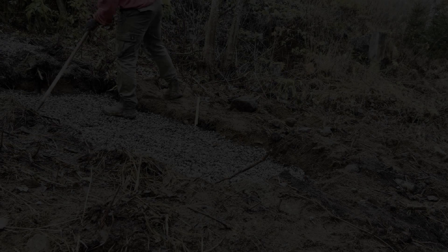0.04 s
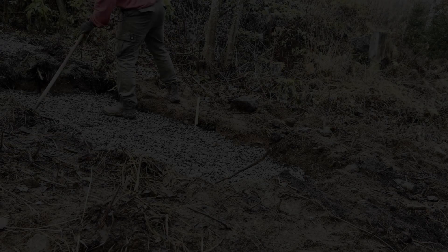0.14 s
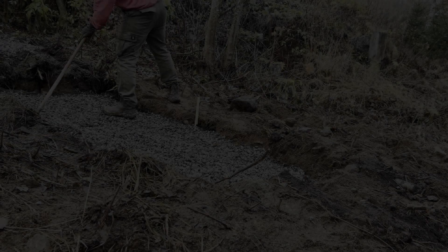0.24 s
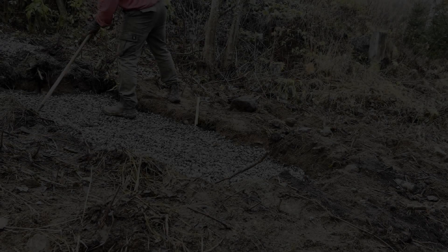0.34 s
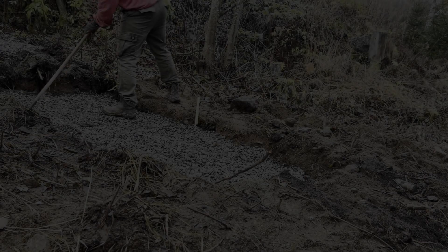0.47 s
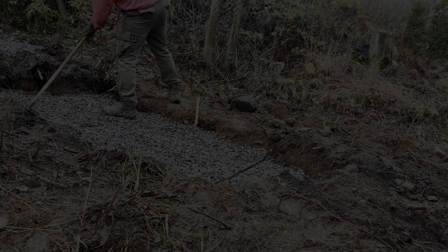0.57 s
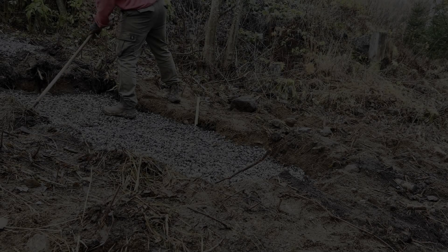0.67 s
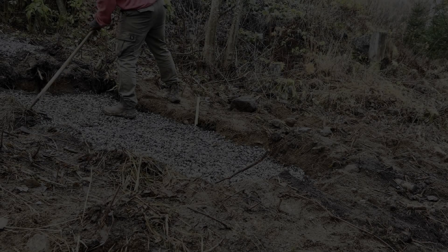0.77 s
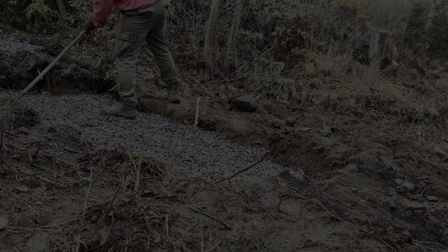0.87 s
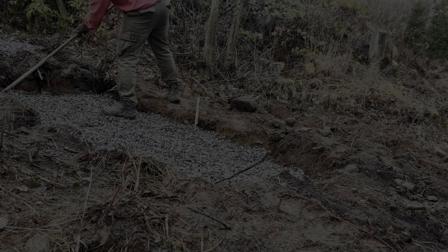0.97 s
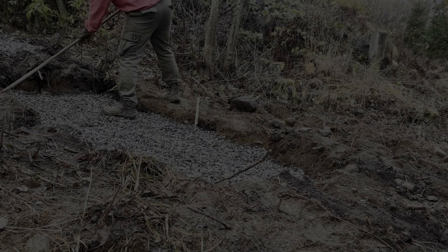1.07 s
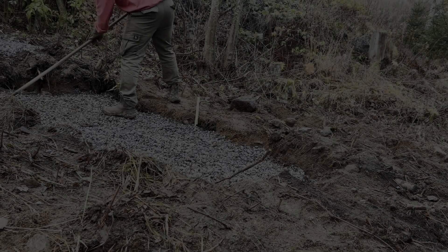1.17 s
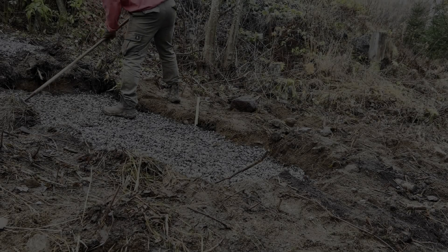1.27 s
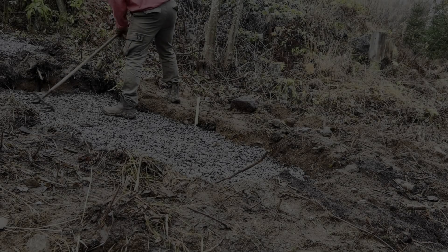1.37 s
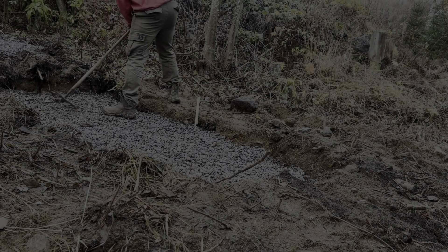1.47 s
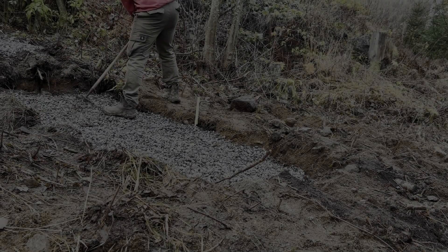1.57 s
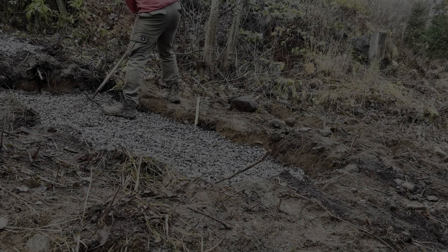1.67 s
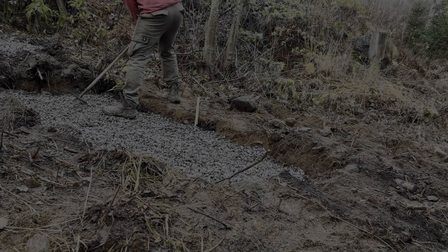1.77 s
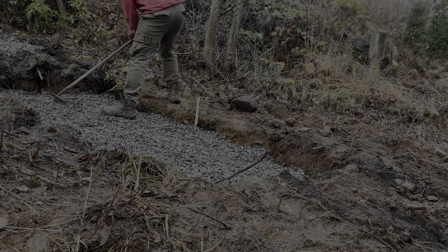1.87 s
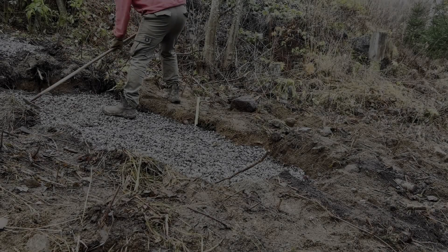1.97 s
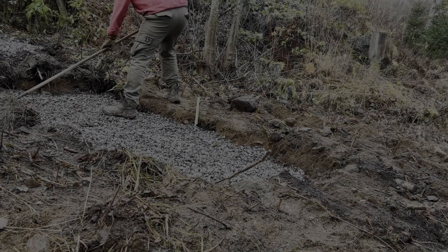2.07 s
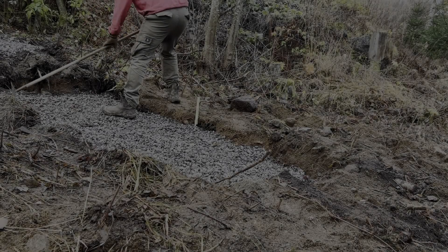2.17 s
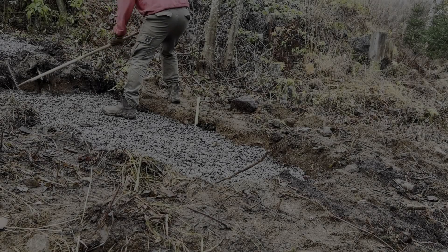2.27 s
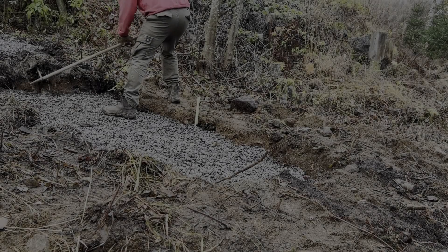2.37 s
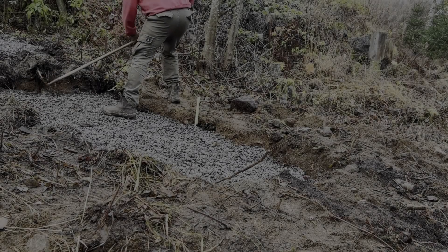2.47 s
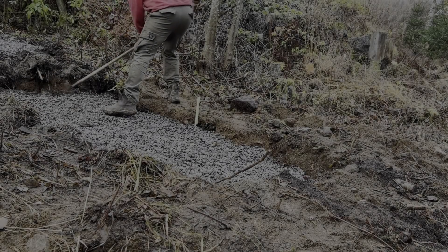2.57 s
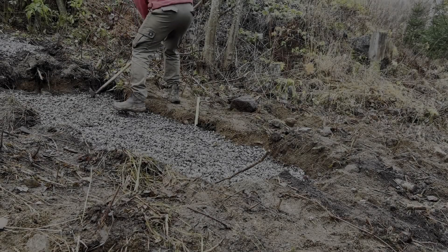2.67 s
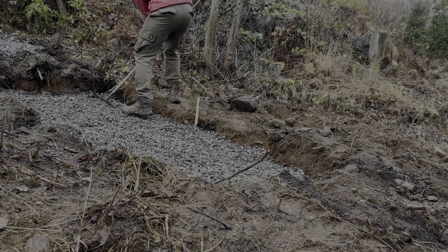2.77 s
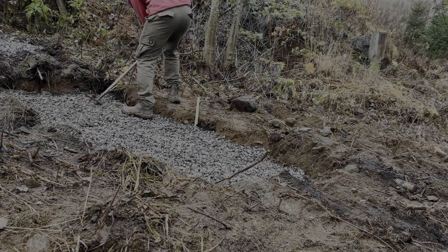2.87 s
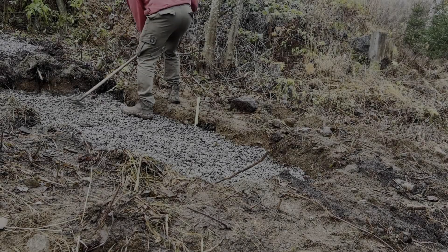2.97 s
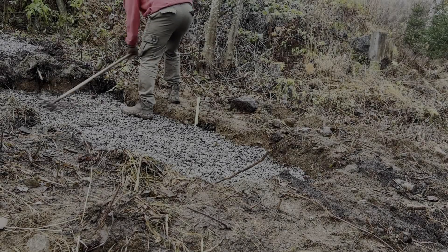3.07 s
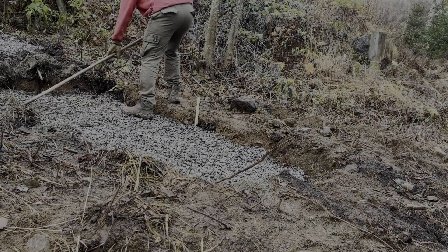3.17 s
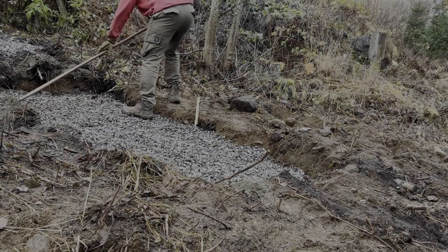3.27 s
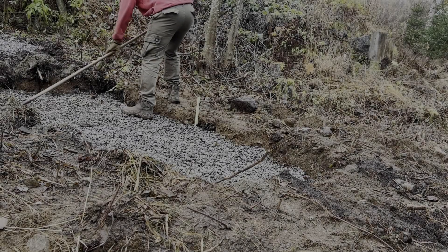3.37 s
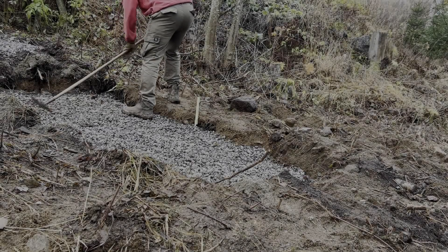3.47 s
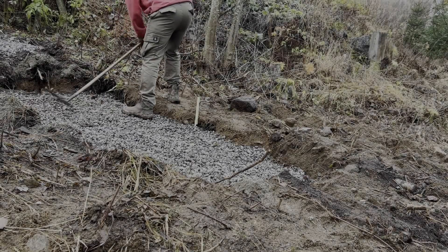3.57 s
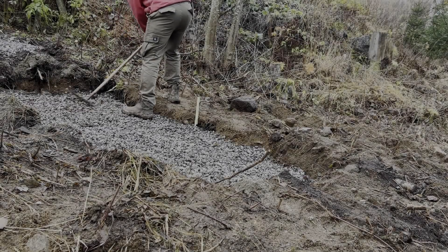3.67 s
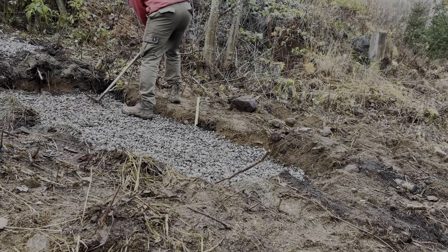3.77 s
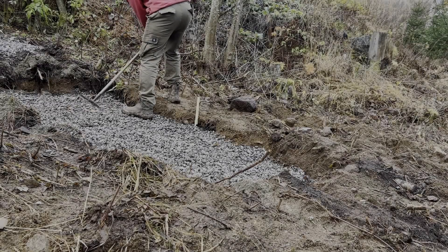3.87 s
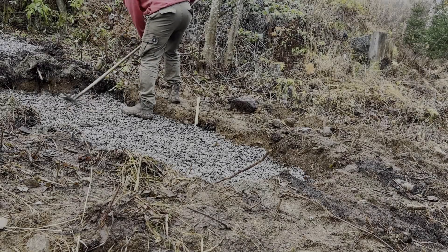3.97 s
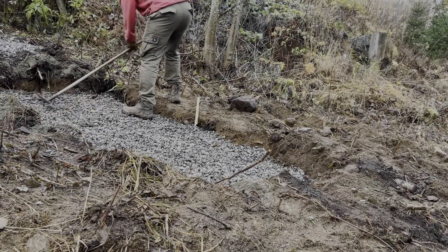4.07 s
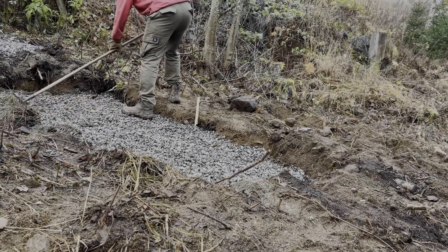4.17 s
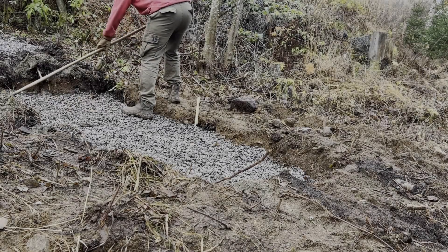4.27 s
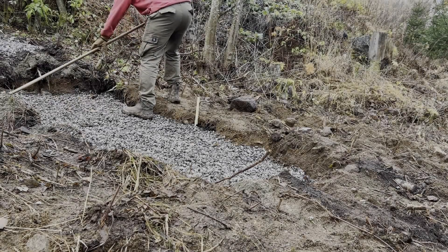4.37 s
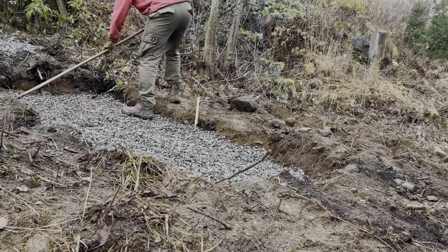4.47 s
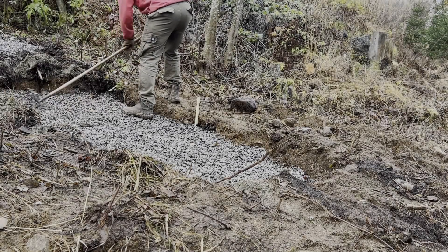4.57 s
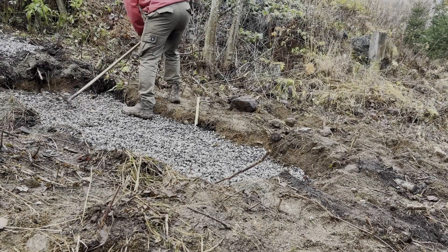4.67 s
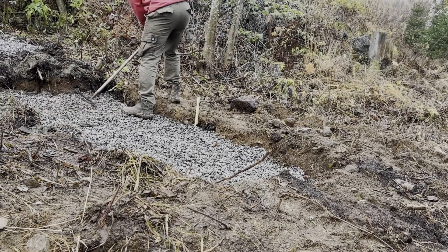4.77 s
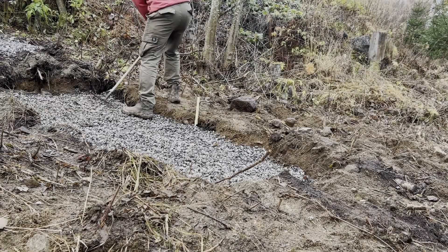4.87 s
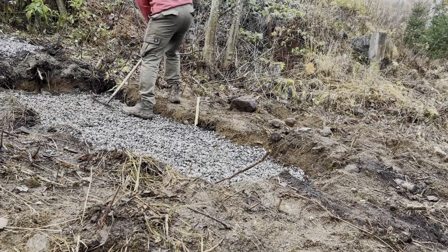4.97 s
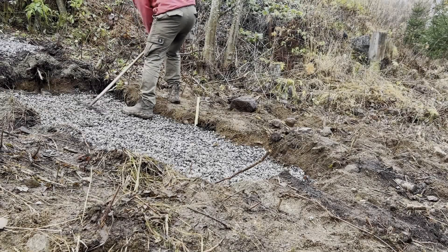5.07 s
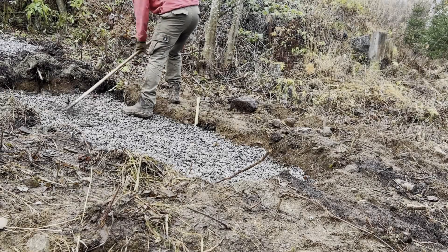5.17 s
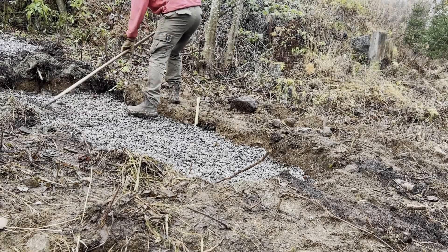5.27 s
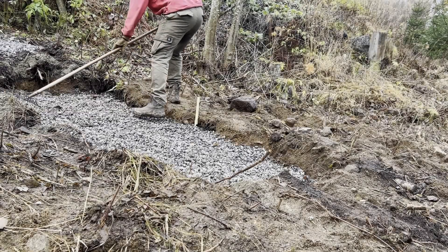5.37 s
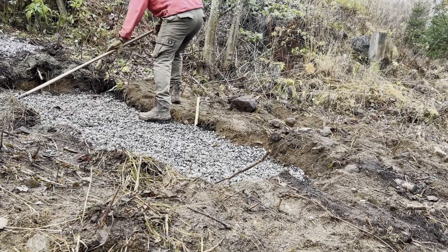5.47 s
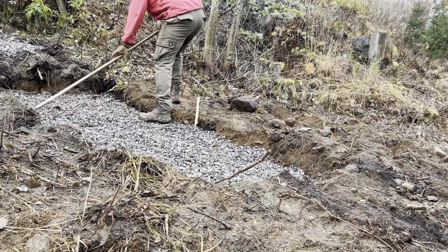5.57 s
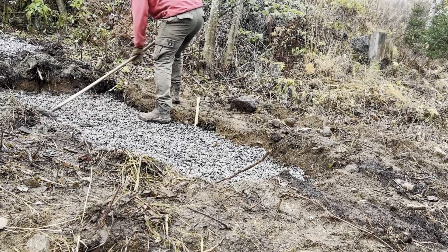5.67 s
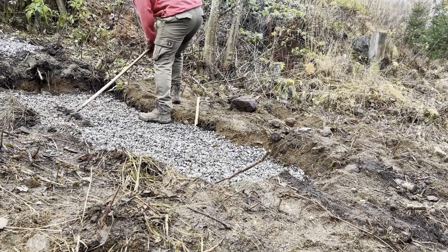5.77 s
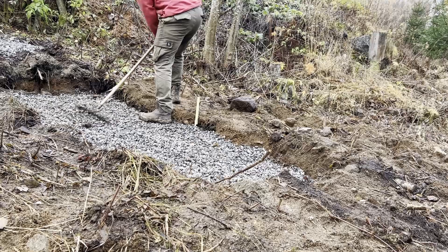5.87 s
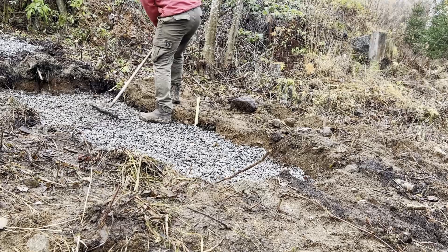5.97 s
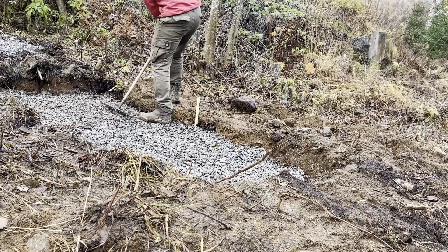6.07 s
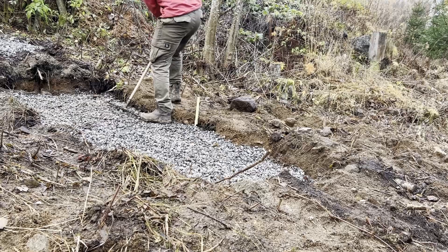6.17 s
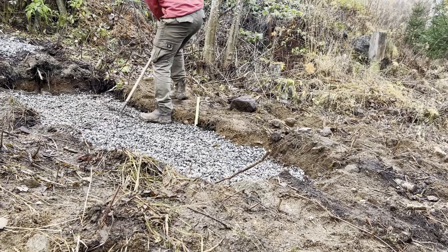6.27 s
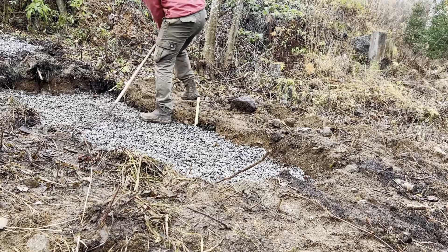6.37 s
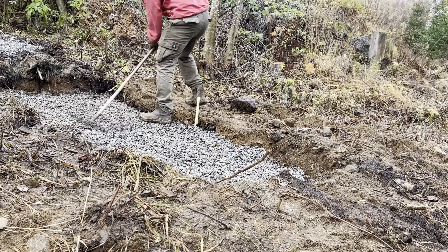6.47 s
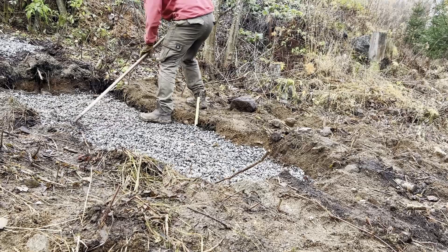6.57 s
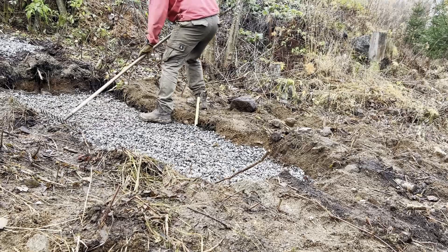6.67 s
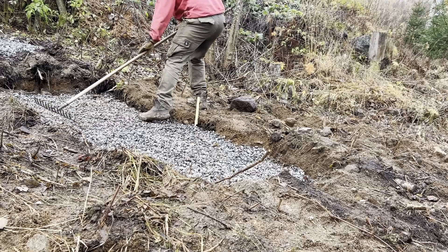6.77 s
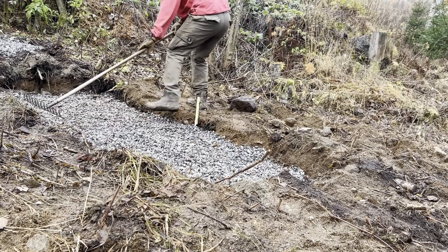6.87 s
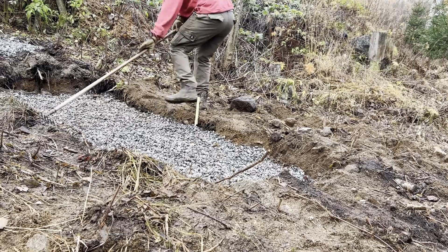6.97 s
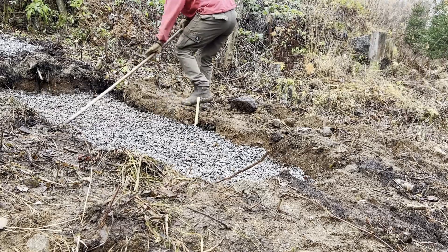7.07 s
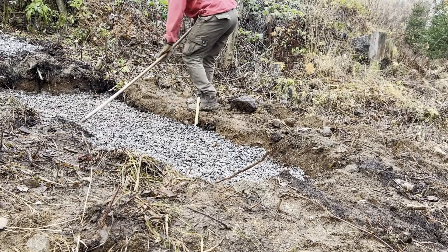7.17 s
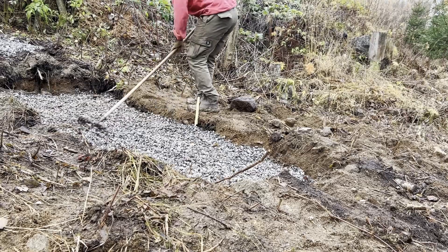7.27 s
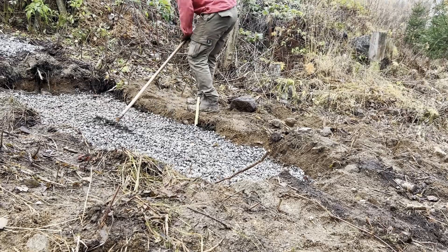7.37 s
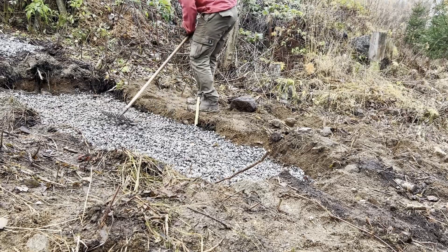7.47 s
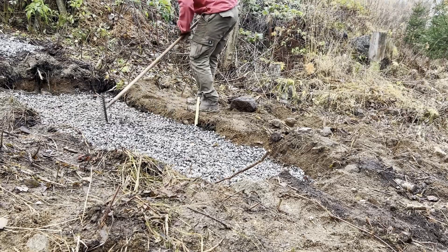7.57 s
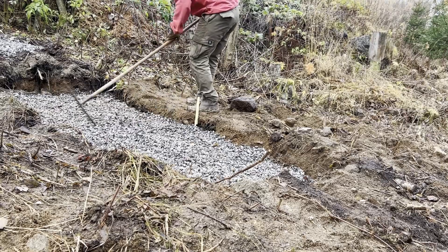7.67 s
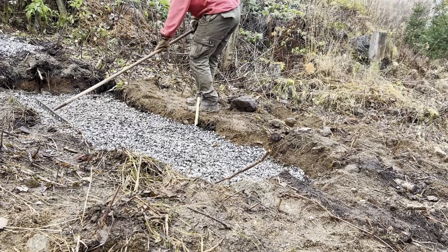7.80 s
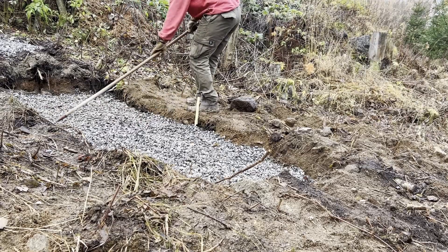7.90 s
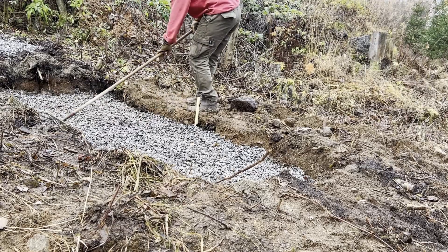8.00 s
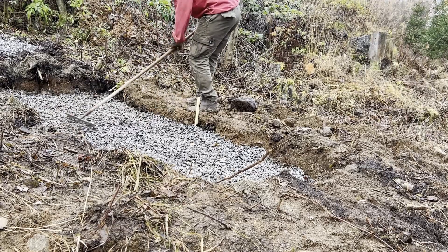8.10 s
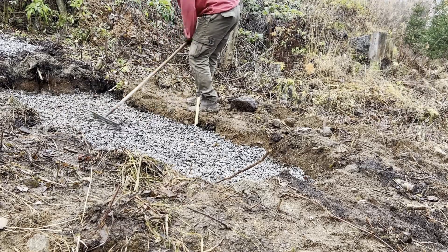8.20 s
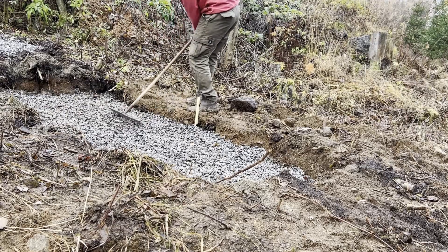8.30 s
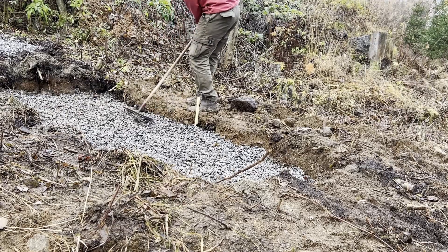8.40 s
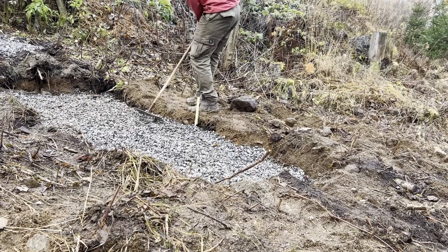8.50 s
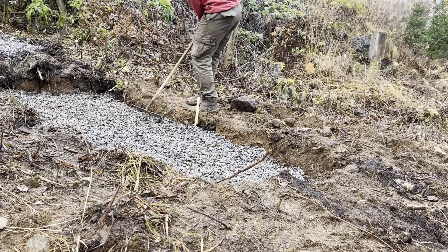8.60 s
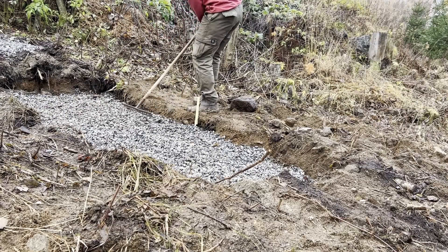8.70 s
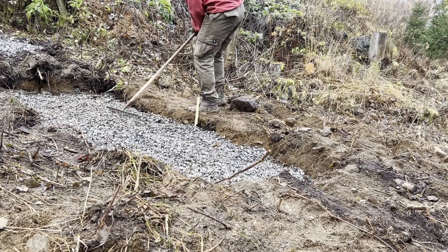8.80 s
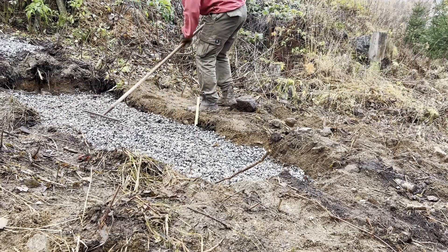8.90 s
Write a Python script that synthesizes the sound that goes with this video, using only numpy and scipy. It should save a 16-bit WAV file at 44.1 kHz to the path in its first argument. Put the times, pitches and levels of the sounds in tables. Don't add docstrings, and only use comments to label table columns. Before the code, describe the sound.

A metal rake is dragged through crushed gravel in uneven strokes outdoors, stones clattering and tines ringing, with low wind buffeting the microphone.

```python
import sys
import numpy as np
from scipy import signal
from scipy.fft import rfft, irfft, next_fast_len
from scipy.io import wavfile
from scipy.ndimage import uniform_filter1d, map_coordinates

SR = 44100
rng = np.random.default_rng(int(sys.argv[2]) if len(sys.argv) > 2 else 0)


def int16_out(signal):
    q = np.round(np.clip(np.atleast_2d(signal).T, -1, 1) * 32767)
    wavfile.write(sys.argv[1], SR, q.astype(np.int16))


def boost_factor(decibels):
    exponent = np.asarray(decibels, float) / 20
    return 10 ** exponent


N = 394298


def unit(x):
    return x / np.sqrt(np.mean(x ** 2) + 1e-20)


def along(points, hz):
    f, v = np.transpose(points)
    return np.interp(np.log(hz + 1), np.log(f + 1), v)


def curve(rows):
    return np.interp(np.arange(N) / SR, *np.transpose(rows))


def wobble(rate):
    coarse = np.arange(0, N + 64, 64)
    knots = rng.standard_normal(int(N / SR * 200) + 4)
    smooth = map_coordinates(knots, [coarse * min(rate, 190) / SR])
    return np.interp(np.arange(N), coarse, smooth)


def filtered(x, response):
    m = next_fast_len(N + SR // 2)
    return irfft(rfft(x, m) * response(np.fft.rfftfreq(m, 1 / SR)), m)[..., :N]


def coloured(x, spectrum):
    return unit(filtered(x, lambda hz: boost_factor(along(spectrum, hz))))


def swells(rows, under_db, swing, lift_db):
    loss_db, roundness = 20, 1.4
    t = np.arange(0, N + 88, 88)[:, None] / SR
    s, db, rise, fall = np.transpose(rows)[:4]
    flank = np.where(t < s, np.maximum(rise, .004), np.maximum(fall, .004))
    away = abs(t - s) / flank
    power = boost_factor(2 * (db + lift_db - swing * loss_db * away ** roundness)).sum(axis=1)
    level = np.interp(np.arange(N) / SR, t[:, 0], power) + boost_factor(2 * under_db)
    return 10 * np.log10(level)


def clacks(s, size, hz, cycles, length=64, soft=.01):
    k = np.arange(length)
    turns = hz[:, None] * k / SR
    decay = np.exp(-turns / cycles) * (1 - np.exp(-turns / soft))
    rows = size[:, None] * np.sin(2 * np.pi * turns) * decay
    at = (s * SR).astype(int)[:, None] + k
    return np.bincount(at.ravel(), rows.ravel(), N + SR)[:N]


# f/Hz, density/dB [dB per Hz]
HUSH = [(20, -20), (50, -2), (200, -5), (400, -4), (800, -9.5), (1500, -18), (2500, -25), (5500, -26),
        (16000, -50)]
# t/s, level/dB [re hush]
LEAVES = [
    (0.0, 10.5),
    (5.5, 6),
    (7.0, 4.5),
    (8.94, 4.5),
]


def hush():
    mid, side = (coloured(rng.standard_normal(N), HUSH) for _ in "ms")
    return boost_factor(-69 - 3 + curve(LEAVES)) * np.array([mid + .7 * side, mid - .7 * side])


# t/s [hardest drag], clatter level/dB, build-up/s, let-go/s, scrape level/dB [re clatter]
PULLS = [(0.3, -49.5, 0.085, 0.26, 3.5), (0.72, -50.5, 0.32, 0.22, -1), (1.241, -44.5, 0.18, 0.36, -0.5),
         (1.541, -45.5, 0.16, 0.4, -4.5), (1.859, -40, 0.22, 0.056, -6.5), (1.97, -37.5, 0.041, .12, -3.5),
         (3.038, -36, 0.3, 0.27, -6), (3.599, -35.5, 0.25, 0.17, -6.5), (4.059, -36, 0.29, 0.21, -6.5),
         (4.591, -39, 0.18, 0.18, -4), (4.68, -39.5, 0.13, 0.13, -5), (5.138, -32.5, 0.16, 0.059, -8),
         (5.208, -36.5, 0.048, 0.078, -4), (5.66, -43, 0.054, 0.84, 0), (5.852, -36, 0.28, 0.31, -12),
         (6.423, -35, 0.19, 0.064, -8), (6.498, -34.5, 0.012, 0.17, -3.5), (7.16, -39, 0.066, 0.27, -4.5),
         (7.345, -36, 0.15, 0.13, -6), (7.24, -40, 0.087, .1, -8), (7.499, -44.5, 0.37, 0.21, -14),
         (8.162, -35, 0.19, 0.36, -9.5), (8.25, -33.5, 0.046, 0.16, -9.5), (8.37, -39, 0.14, 0.042, -7),
         (6.58, -43.5, 0.071, 0.13, -3)]
# t/s, clatter level/dB, build-up/s, let-go/s, scrape level/dB [re clatter]
POKES = [(0.0, -58.5, 0.082, 0.22, -1), (0.205, -49.5, .012, 0.082, 5), (0.519, -45, 0.022, 0.041, 1.5),
         (1.03, -45, 0.02, 0.087, 2), (1.438, -40.5, 0.046, 0.031, -16), (2.19, -56.5, 0.052, 0.028, 2),
         (2.36, -52.5, 0.092, 0.09, 2.5), (2.6, -66, 0.95, 0.35, -0.5), (2.687, -43.5, 0.019, 0.033, 2.5),
         (2.789, -41, 0.024, 0.033, -6.5), (3.33, -57.5, 0.026, 0.2, 7), (3.799, -46.5, 0.26, 0.058, -9.5),
         (4.36, -61.5, 0.028, 0.14, 5), (4.839, -46, 0.086, 0.15, -11), (5.349, -55.5, 0.3, 0.12, -10.5),
         (5.48, -51.5, 0.024, 0.028, -4), (6.17, -48, 0.46, 0.049, -19.5), (6.72, -56.5, 0.077, 0.22, -3.5),
         (7.075, -44, 0.011, 0.13, 0.5), (7.922, -51, .015, 0.57, 5.5), (8.529, -46.5, 0.085, 0.086, -6),
         (8.62, -67.5, 0.082, 0.16, -5), (7.72, -71.5, .1, .25, 4.5), (8.78, -82, 0.091, 0.099, 10),
         (8.29, -35.5, 0.039, .02, -6.5), (0.335, -53, 0.024, .05, 3)]
# t/s, peak level/dB, build-up/s, let-go/s
SCUFFS = [
    (1.98, -54.5, 0.031, 0.25),
    (2.82, -48, 0.12, 0.17),
    (5.08, -58.5, 0.31, 0.15),
    (5.5, -51.5, 0.052, 0.41),
    (6.17, -47, 0.015, 0.051),
    (6.7, -61.5, 0.089, 0.49),
    (7.085, -50, 0.028, 0.085),
]


def strokes():
    rows = np.vstack([PULLS, POKES])
    settle_db = -88
    clatter_db = swells(rows, settle_db, 1, 0)
    scrape_db = swells(rows, settle_db + 4.5, 0.76, rows[:, 4]) - clatter_db
    bed_db = -59 + 0.76 * (clatter_db + 43.0)
    return clatter_db, scrape_db, swells(SCUFFS, bed_db, 1, 0)


BITES = [0.198, 0.506, 1.007, 1.519, 1.938, 2.336, 2.666, 5.595, 6.154, 6.3, 6.489, 7.063, 7.907, 8.225]


def biting(x, before, after):
    at = np.arange(N)
    for s in BITES:
        start, bite, end = round((s - before) * SR), round(s * SR), round((s + after) * SR)
        at[start:bite] = start
        at[bite:end] = end
    return uniform_filter1d(x[at], size=66)


# t/s, peak level/dB, tine ring level/dB [re peak], t60/s
JOLTS = [(0.192, -30, -6, 0.023), (0.231, -19, -8.5, 0.038), (1.3628, -33, -22.5, 0.037),
         (1.4364, -18.5, -2, 0.018), (1.517, -24, -6, 0.082), (1.5814, -27.5, -3, 0.075),
         (1.615, -29.5, 0.5, 0.13), (1.699, -43, -37, 0.011), (1.874, -24, -25, 0.042),
         (1.943, -31, -21.5, 0.09), (2.3364, -21, -13, 0.024), (2.359, -16.5, -3, 0.016),
         (2.67, -19, -12.5, 0.055), (3.099, -12, -10.5, 0.02), (3.2405, -21.5, -13, 0.014),
         (3.425, -32.5, 0.5, 0.29), (4.684, -20, -18.5, 0.087), (4.734, -27.5, -9, 0.042),
         (4.999, -31, -30, 0.09), (5.5976, -22.5, 11, 0.04), (5.765, -22.5, -3.5, 0.065),
         (6.156, -26, -11, 0.028), (6.301, -39, -12, 0.2), (6.447, -15, -20, 0.036),
         (6.494, -21.5, -10.5, 0.084), (7.0656, -12.5, 2, 0.023), (7.909, -23, 1, 0.069),
         (8.0366, -34, 3, 0.064), (8.227, -13.5, -19, 0.038), (8.4706, -22, -27, 0.019),
         (8.545, -28, -30, 0.022)]


def bursts(rise):
    t = np.arange(SR // 4) / SR
    stone, steel = np.zeros(N + SR), np.zeros(N + SR)
    for s, db, ring_db, t60 in JOLTS:
        shape = boost_factor(-60 * t / max(t60, .005)) * (1 - np.exp(-t / rise))
        stone[round(s * SR):][:len(t)] += boost_factor(db) * shape
        steel[round(s * SR):][:len(t)] += boost_factor(db + ring_db) * shape
    return stone[:N], steel[:N]


def shower(busy, spread_db, centre_hz, octaves, cycles, bed_db, count):
    s, chance, draw, pitch, ring = rng.random((count, 5)).T
    s = s * (N - 1) / SR
    share = busy[(s * SR).astype(int)]
    size = boost_factor(-spread_db * np.log(1 - .995 * draw)) * (chance < share) / np.sqrt(share)
    hz = np.clip(centre_hz * 2 ** (octaves * (2 * pitch - 1)), 200, 17000)
    life = cycles * 8 ** (ring ** 2)
    x = unit(clacks(s, size * np.sqrt(hz / life), hz, life[:, None], length=96))
    own = np.sqrt(signal.welch(x, SR, nperseg=128)[1]) + 1e-4
    own_hz = np.linspace(0, SR / 2, len(own))
    x = unit(filtered(x, lambda f: 1 / np.interp(f, own_hz, own)))
    return unit(x + boost_factor(bed_db) * rng.standard_normal(N))


def patchy(x, depth_db):
    z = signal.stft(x, nperseg=512)[2]
    field = uniform_filter1d(rng.standard_normal(z.shape), size=4, axis=0)
    field = uniform_filter1d(field, size=5, axis=1)
    return unit(signal.istft(z * boost_factor(depth_db * unit(field)), nperseg=512)[1][:N])


# f/Hz, bandwidth/Hz, level/dB
TINES = [(1039, 30, -8), (1634, 82, -0.5), (1970, 36, -5.5), (2500, 38, 2.5), (2712, 25, -6.5),
         (2850, 41, -0.5), (3520, 30, -2), (3777, 39, 0), (4180, 15, -10), (4570, 31, -1.5),
         (5000, 16, -11), (5250, 54, -8.5), (6000, 26, 3)]


def ringing(knocks, restless_db):
    m = next_fast_len(N + SR // 2)
    f, total = np.fft.rfftfreq(m, 1 / SR), 0
    for k, (hz, width, db) in enumerate(TINES):
        drive = rfft(knocks * boost_factor(db + restless_db * wobble(22)), m)
        total = total + (-1) ** k * drive * 1j * f * width / (hz * hz - f * f + 1j * f * width)
    return irfft(total, m)[:N]


# f/Hz, density/dB [dB per Hz]
STONES = [(1500, -40), (3000, -20), (5000, -10), (5700, -3), (7200, -4), (8200, -1.5), (10000, 0),
          (13000, -3), (15500, -3.5)]
SCRAPE = [(400, -72), (900, -8.5), (2000, -1.5), (3500, -4.5), (5000, -10.5), (7000, -12.5)]
EARTH = [(60, -40), (150, -6.5), (400, -8), (800, -10.5), (1500, -25)]


def rake():
    clatter_db, scrape_db, rumble_db = strokes()
    clatter_db = biting(clatter_db, before=.028, after=.008)
    scrape_db = biting(scrape_db, before=.028, after=.008)
    stone, steel = bursts(rise=0.0038)
    lumps = boost_factor(.45 * wobble(30) + 1.0 * wobble(90))
    busy = np.clip(boost_factor(.7 * (clatter_db + 40)), .25, 1)

    stones = shower(busy, spread_db=1.3, centre_hz=8000, octaves=1.2, cycles=1.3, bed_db=-1, count=26000)
    stones = coloured(patchy(stones, depth_db=1.9), STONES)
    high = (boost_factor(clatter_db + 5.5) * lumps + boost_factor(-3.0) * stone) * stones

    push = boost_factor(clatter_db + scrape_db) * lumps + boost_factor(-10.0) * steel
    knocks = shower(busy, spread_db=2.0, centre_hz=2500, octaves=1.6, cycles=1.2, bed_db=0, count=10000)
    knocks = push * patchy(knocks, depth_db=1.8)
    contact = np.clip(boost_factor(.3 * (scrape_db + 5) + .5 * (clatter_db + 43)), 0, 1.5)
    ring = ringing(knocks * contact, restless_db=3.2)
    middle = np.std(knocks) * (boost_factor(-3.2) * coloured(knocks, SCRAPE) + boost_factor(-4) * unit(ring))

    rumble = coloured(rng.standard_normal(N), EARTH) * boost_factor(1.4 * wobble(25) + 1.5 * wobble(8))
    return high + middle + boost_factor(rumble_db + 0.6) * rumble


# t/s, peak level/dB, f/Hz, t60/s
CLINKS = [(0.1957, -46.5, 1750, 0.18), (0.235, -36, 2030, 0.036), (0.5103, -40, 2140, 0.056),
          (1.532, -39.5, 3740, 0.064), (1.5868, -39.5, 5270, 0.036), (1.942, -42, 2120, 0.076),
          (2.189, -39.5, 2820, 0.025), (2.338, -42.5, 3720, 0.052), (2.359, -50, 2500, 0.2),
          (2.673, -36.5, 4770, 0.093), (3.1623, -35.5, 2020, 0.15), (3.2007, -32.5, 3540, 0.037),
          (3.242, -33.5, 3590, 0.067), (3.3107, -41.5, 2470, 0.16), (3.4195, -37, 4650, 0.086),
          (3.6062, -37, 2700, 0.098), (4.586, -36.5, 2090, 0.12), (4.6871, -41, 3450, 0.18),
          (5.0097, -40, 5000, 0.091), (5.6009, -30.5, 3100, 0.035), (5.7729, -33.5, 4600, 0.058),
          (6.1597, -46, 3870, 0.078), (6.4965, -41, 2420, 0.21), (7.0741, -26.5, 1970, 0.028),
          (7.9167, -34.5, 2390, 0.049), (8.1, -39, 2850, 0.059), (8.225, -38, 2810, 0.071),
          (8.334, -30, 4760, 0.054), (8.412, -43.5, 4140, 0.082), (8.422, -45, 1604, 0.087)]
# t/s, peak level/dB, f/Hz, t60/s
CHINKS = [(0.3296, -39.5, 2020, 0.045), (0.6479, -45, 1614, 0.066), (0.706, -43.5, 2400, 0.12),
          (0.8385, -45.5, 2080, 0.059), (2.0083, -39.5, 2000, 0.055), (2.796, -40, 4560, 0.04),
          (3.075, -37, 1590, 0.045), (3.0894, -33.5, 3510, 0.041), (3.1343, -37.5, 2660, 0.062),
          (3.3953, -44, 2880, 0.069), (3.73, -39, 2650, 0.042), (4.3455, -51, 3500, 0.077),
          (4.3694, -43.5, 3630, 0.043), (4.4493, -44.5, 2500, 0.095), (4.561, -48, 2460, 0.037),
          (5.1871, -42, 2500, 0.058), (5.674, -40, 2500, 0.05), (5.9484, -45, 4630, 0.042),
          (6.324, -42, 4430, 0.05), (7.1382, -36.5, 2500, 0.069), (7.2011, -38, 2500, 0.064),
          (7.3026, -37, 3430, 0.035), (8.0491, -40, 2530, 0.044)]


def clinks():
    s, db, hz, t60 = np.vstack([CLINKS, CHINKS]).T
    life = (np.clip(t60, .01, .15) / np.log(1000))[:, None]
    out = clacks(s, boost_factor(db - 3), hz, life * hz[:, None], length=3000, soft=2)
    spread = rng.standard_normal((len(s), len(TINES)))
    for k, (mode_hz, _, mode_db) in enumerate(TINES):
        size = boost_factor(db + mode_db - 12 + 4 * spread[:, k])
        out = out + clacks(s, size, mode_hz + 0 * s, life * mode_hz, length=2000, soft=2)
    return out


# t/s, peak level/dB, f/Hz
THUMPS = [
    (0.24, -50, 72.7),
    (5.603, -41, 82),
    (6.157, -51, 217),
    (6.498, -40, 128),
    (7.069, -46.5, 79.5),
    (7.921, -47, 144),
]


def thumps():
    out, t = np.zeros(N + SR), np.arange(SR // 4) / SR
    for s, db, hz in THUMPS:
        shape = boost_factor(db + 7.5 - 60 * t / 0.076) * (1 - np.exp(-t / 0.0025))
        out[round(s * SR):][:len(t)] += shape * np.sin(2 * np.pi * hz * t)
    return out[:N]


# f/Hz, density/dB [dB per Hz]
GUST = [(12, -41), (25, -17), (45, 4.5), (62, 8.5), (100, -1), (157, -14), (265, -28), (300, -38.5),
        (390, -54), (660, -120)]
# t/s, level/dB
BREEZE = [(0.0, -93), (0.6, -64), (1.6, -58), (2.4, -63), (3.0, -53), (4.2, -51), (4.4, -57), (4.9, -65),
          (5.4, -79), (6.0, -63.5), (6.7, -76), (7.5, -76), (8.94, -79)]
# t/s, peak level/dB, build-up/s, let-go/s
PUFFS = [(0.25, -55, 0.031, 0.15), (1.62, -52.5, 0.13, 0.55), (1.99, -54, 0.073, 0.25),
         (2.21, -48, 0.033, 0.075), (2.54, -40, .14, 0.1), (2.8, -46.5, 0.33, 0.089),
         (2.92, -38, 0.041, 0.081), (3.11, -41, .2, 0.21), (3.26, -34, 0.047, 0.029),
         (3.34, -42, 0.046, 0.12), (3.61, -36.5, 0.16, 0.096), (3.73, -31.5, 0.099, 0.034),
         (3.97, -34.5, 0.056, 0.1), (4.19, -32.5, 0.085, 0.089), (4.28, -33, 0.22, 0.014),
         (4.58, -54, 0.084, .25), (5.05, -55, 0.054, 0.33), (5.18, -55, 0.1, 0.16),
         (5.63, -45.5, 0.06, 0.073), (5.85, -48.5, .14, 0.095), (6.5, -49.5, 0.044, 0.16),
         (7.11, -46, 0.02, 0.09), (7.3, -49, .11, 0.15), (7.94, -55.5, 0.034, 0.23),
         (8.26, -52.5, 0.13, 0.21), (8.38, -57, .2, .09)]


def wind():
    level_db = swells(PUFFS, curve(BREEZE), 1, 0)
    mid, side = (coloured(rng.standard_normal(N), GUST) for _ in "ms")
    mid = mid / (uniform_filter1d(abs(mid), size=2600) + .25) * boost_factor(2 * wobble(14))
    return boost_factor(level_db) * np.array([mid + .19 * side, mid - .19 * side])


# t/s, peak level/dB, f/Hz
CLODS = [
    (0.611, -48.5, 340),
    (3.335, -42.5, 458),
    (5.489, -52, 575),
    (5.532, -47, 366),
    (5.58, -42, 520),
    (6.061, -45, 592),
    (6.164, -48.5, 993),
    (6.678, -41, 670),
    (6.704, -47, 635),
    (6.719, -47, 413),
]
# t/s, peak level/dB, f/Hz
SNAPS = [(1.0096, -40, 10100), (1.0235, -36, 9530), (1.1632, -39, 8300), (1.2186, -31, 11000),
         (1.3628, -28, 11300), (1.4366, -25, 10100), (1.4835, -33, 11500), (1.5209, -32, 10300),
         (1.5818, -27, 9120), (1.699, -33, 9690), (1.8751, -23, 10300), (1.939, -32, 9420),
         (1.9405, -27, 11100), (2.1071, -42, 9920), (2.1839, -43, 11000), (2.3051, -41, 10400),
         (2.3366, -34, 10300), (2.359, -41, 10300), (2.3989, -42, 9080), (2.4703, -49, 9860),
         (2.6708, -29, 9300), (2.6788, -28, 11000), (2.7641, -32.5, 8640), (2.791, -38, 9520),
         (3.1018, -10.5, 9840), (3.2395, -34, 9510), (3.4261, -36, 6000), (3.4261, -26, 10400),
         (3.7284, -31, 8630), (4.3235, -43, 9900), (4.3684, -50, 9120), (4.4478, -39, 9120),
         (4.564, -26, 11000), (4.6852, -17, 11300), (4.8189, -25, 8930), (4.9835, -38, 8380),
         (5.0, -31, 8090), (5.1901, -25, 10100), (5.3188, -42, 11500), (5.3372, -33, 9100),
         (5.3821, -48, 10200), (5.4719, -36, 8580), (5.5982, -33, 10900), (5.5982, -32, 11100),
         (5.7658, -12.5, 9990), (6.1554, -25, 9520), (6.3016, -29, 9590), (6.4467, -10, 10100),
         (6.4916, -22, 9500), (6.4981, -17, 10400)]
# t/s, peak level/dB, f/Hz
TICKS_EARLY = [
    (6.7675, -39, 9810),
    (6.8433, -49, 10100),
    (6.8794, -60, 10400),
    (6.8932, -56, 10600),
    (6.9257, -56, 8900),
]
TICKS = [(7.4114, -28, 9830), (7.4384, -25, 9290), (7.4604, -27.5, 9790), (7.4844, -29, 8930),
         (7.509, -25, 8500), (7.5154, -28, 8670), (7.5314, -27, 9270), (7.558, -23, 8700),
         (7.5664, -35, 10150), (7.5754, -32, 9060), (7.5874, -37, 8760), (7.6184, -25.5, 10500),
         (7.6534, -43, 8930), (7.6654, -44, 8060), (7.6804, -47, 9040), (7.6903, -36, 9420),
         (7.6989, -38, 9750), (7.7268, -53, 8530), (7.7364, -49, 8070), (7.7424, -53, 8520),
         (7.7588, -45, 8510), (7.7866, -57, 8710), (7.855, -50, 9100), (7.88, -51, 10100)]
TICKS_LATE = [(8.2798, -25, 9410), (8.3355, -23, 10100), (8.4484, -32, 8290), (8.4706, -33, 10500),
              (8.4966, -30, 9570), (8.5014, -33, 9330), (8.5104, -29, 8810), (8.5204, -27, 9320),
              (8.5446, -25, 8030), (8.554, -21, 9390), (8.5614, -30, 9100), (8.566, -29, 8800),
              (8.5899, -31, 9730), (8.6014, -43, 8730), (8.6154, -45, 9220), (8.6313, -41, 8420),
              (8.6512, -45, 8250), (8.6747, -32, 8800), (8.7405, -55, 9150), (8.7594, -60, 8540)]


def falling():
    lulls = np.vstack([TICKS, TICKS_EARLY, TICKS_LATE]) + [0, 9, 0]
    s, db, hz = np.vstack([lulls, np.array(SNAPS) + [0, 5, 0]]).T
    out = clacks(s, boost_factor(db), hz, cycles=1.8, soft=1)
    chip_db, chip_s = -7, .005
    late, shift, size = rng.random((len(s), 3, 4)).transpose(1, 2, 0)
    for k in range(4):
        chip_size = boost_factor(db + chip_db - 8 * size[k])
        chip_hz = hz * 2 ** (.4 - .9 * shift[k])
        out = out + clacks(s + chip_s * late[k], chip_size, chip_hz, cycles=1.2, soft=.6)
    s, db, hz = np.transpose(CLODS)
    return out + clacks(s, boost_factor(db + 3.5), hz, cycles=1.4, length=600, soft=.3)


# f/Hz, left lead/rad
LEAD = [(0, 0), (1550, 1.2), (2330, -.1), (4650, 0), (5000, -.3), (5430, 2), (6550, 2.3), (7250, 3.14),
        (9300, 6.28), (12750, 9.42), (15600, 12.57)]
# f/Hz, left minus right level/dB
TILT = [(200, -.5), (700, .7), (1750, 3.8), (2250, .6), (2800, -2.2), (3800, -3.4), (4800, -1.8),
        (5500, -4.5), (7000, -2.5), (8000, 0)]
# f/Hz, likeness/1 [0-1]
ALIKE = [(200, .8), (650, .5), (1100, .75), (2400, .86), (3500, .72), (5100, .45), (5800, .78), (7200, .77),
         (9400, .85), (12700, .83), (15600, .85)]


def ports(x):
    z = signal.stft(x, nperseg=128)[2]
    scrambled = z * np.exp(2j * np.pi * rng.random(z.shape))
    scattered = signal.istft(scrambled, nperseg=128)[1][:N]
    wider = np.clip(np.arange(N) / SR - 5.2, 0, 1)
    scattered = unit(scattered) * np.std(x) * boost_factor(1.2 * wobble(9) - .6 + 2.2 * wider)

    def turn(hz):
        return np.arccos(np.clip(along(ALIKE, hz), 0, 1)) / 2

    def port(signal_in, sign):
        def response(hz):
            lead = np.interp(hz, *np.transpose(LEAD)) / 2
            return boost_factor(sign * along(TILT, hz) / 2) * np.exp(1j * sign * lead)
        return filtered(signal_in, response)

    shared = filtered(x, lambda hz: np.cos(turn(hz)))
    apart = filtered(scattered, lambda hz: np.sin(turn(hz)) * (hz > 200))
    return np.array([port(shared + apart, 1), port(shared - apart, -1)])


def scene():
    return hush() + ports(rake() + clinks() + thumps() + falling()) + wind()


def joint_stereo(x, weak_db):
    sum_difference = np.array([x[0] + x[1], x[0] - x[1]]) / 2
    hz, _, z = signal.stft(sum_difference, SR, nperseg=2048)
    band = np.arange(len(hz)) // 16
    power = np.add.reduceat(abs(z) ** 2, np.arange(0, len(hz), 16), axis=1)
    power = uniform_filter1d(power, size=3, axis=2)
    strong = (power > boost_factor(2 * weak_db) * power[::-1])[:, band]
    keep = strong | (hz < 2000)[:, None]
    mid, side = signal.istft(z * keep, nperseg=2048)[1][:, :N]
    return np.array([mid + side, mid - side])


def low_pass(x):
    return signal.sosfilt(signal.butter(12, 16970, fs=SR, output="sos"), x)


def record(dry):
    limited = filtered(dry, lambda hz: hz < 15800)
    mix = joint_stereo(limited, weak_db=-8.3)
    return low_pass(mix)


dry = scene()
out = record(dry)
int16_out(out)
```